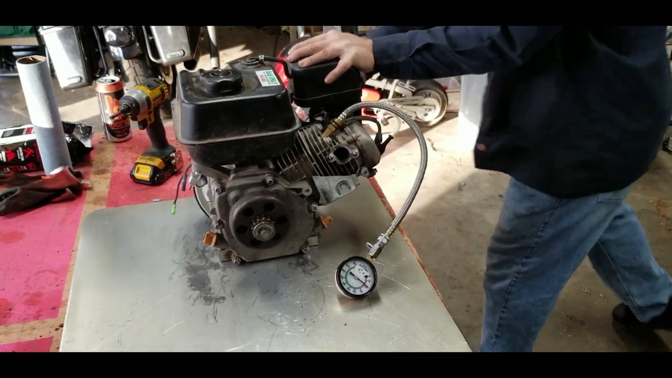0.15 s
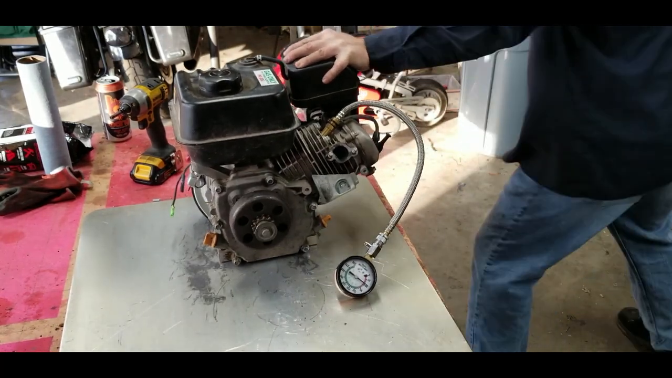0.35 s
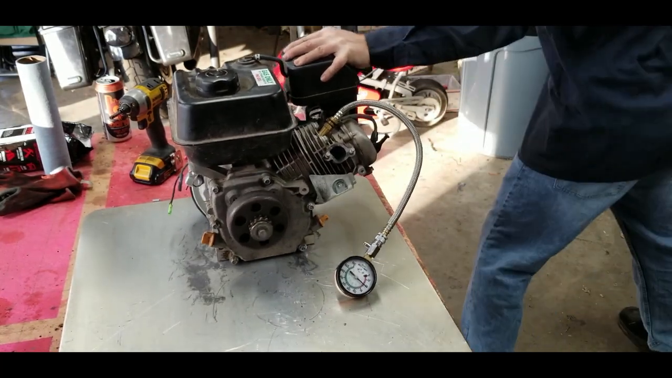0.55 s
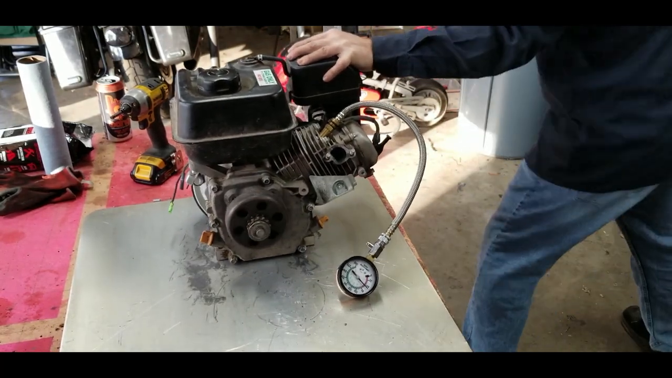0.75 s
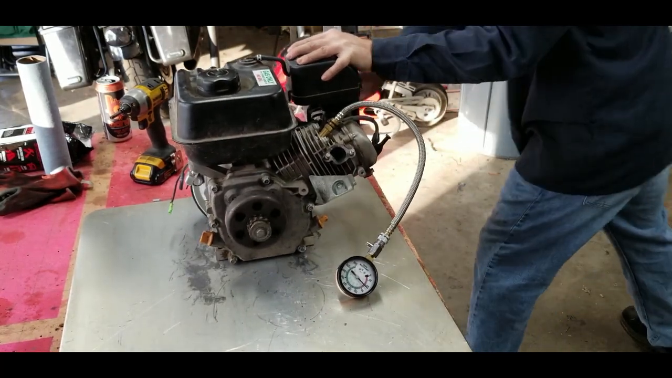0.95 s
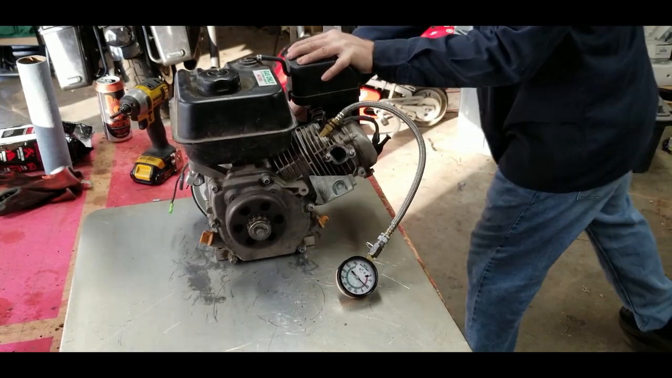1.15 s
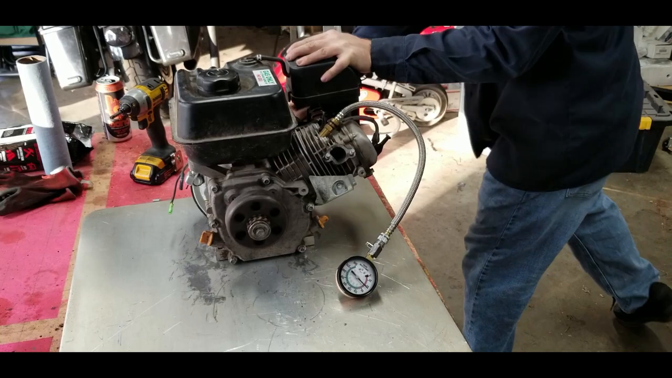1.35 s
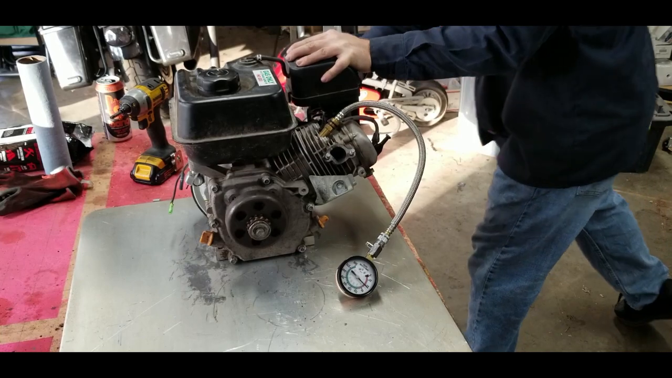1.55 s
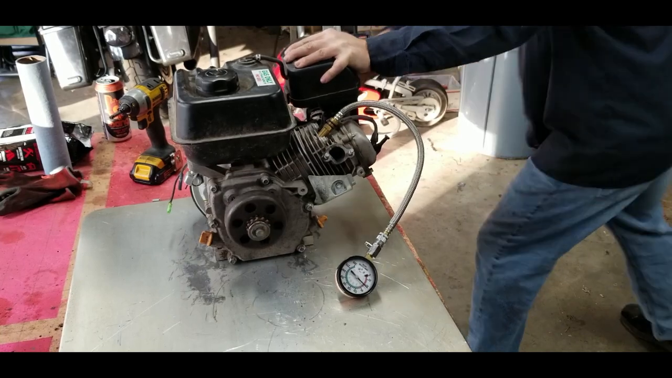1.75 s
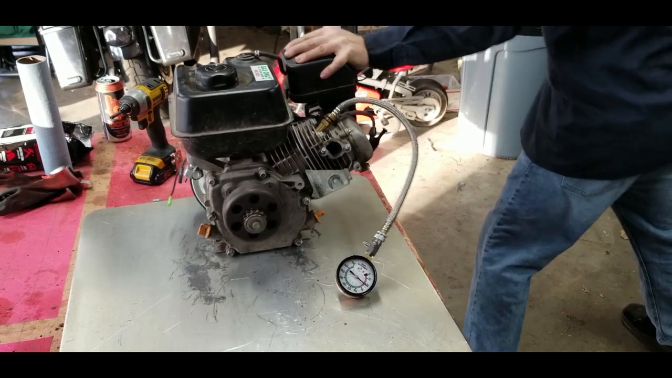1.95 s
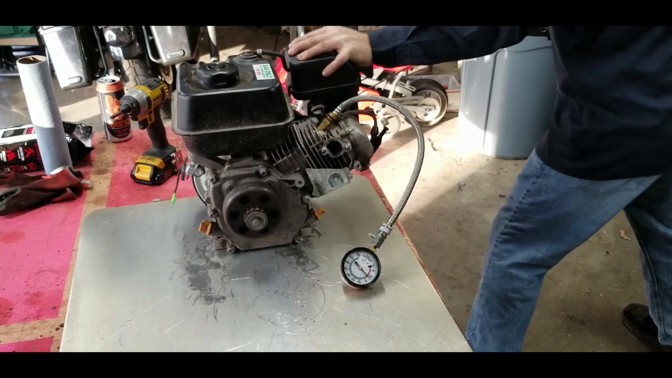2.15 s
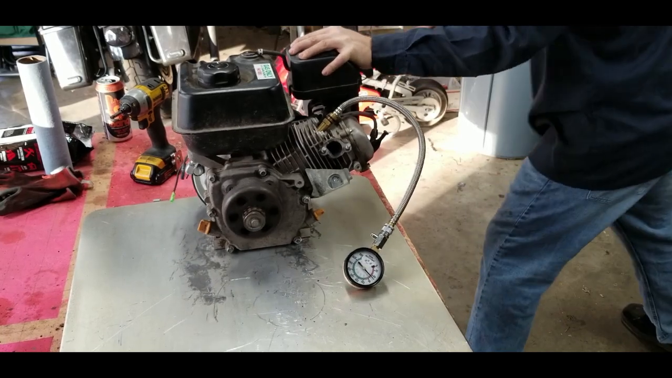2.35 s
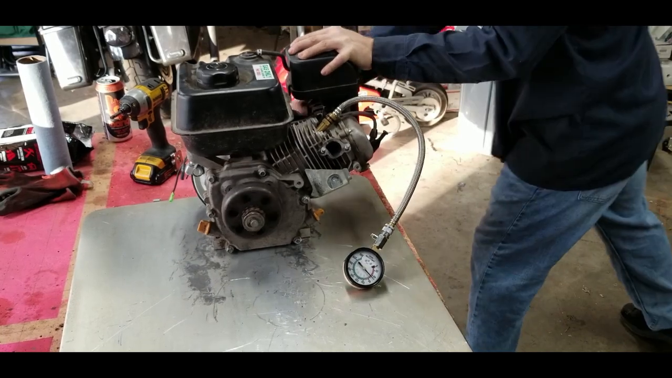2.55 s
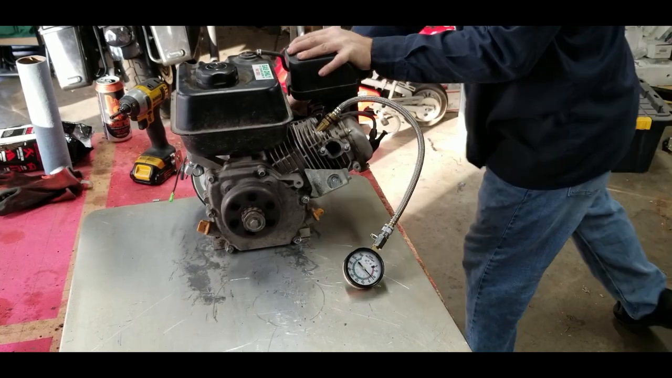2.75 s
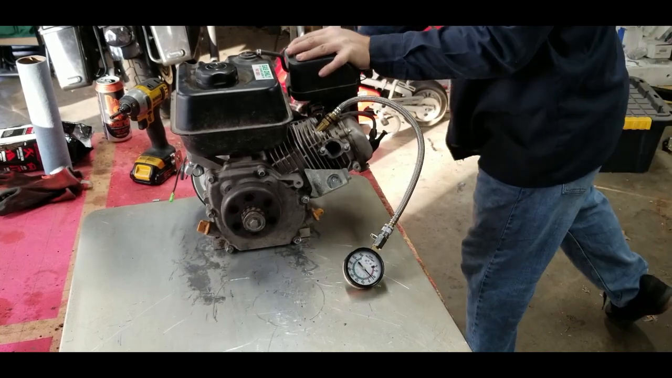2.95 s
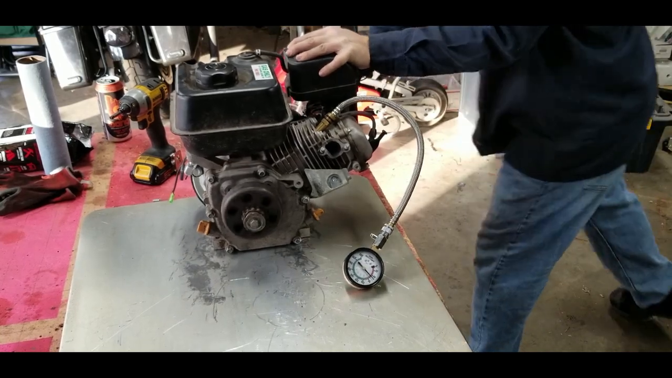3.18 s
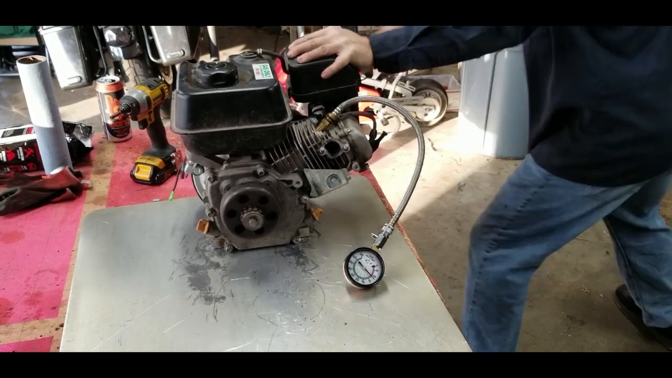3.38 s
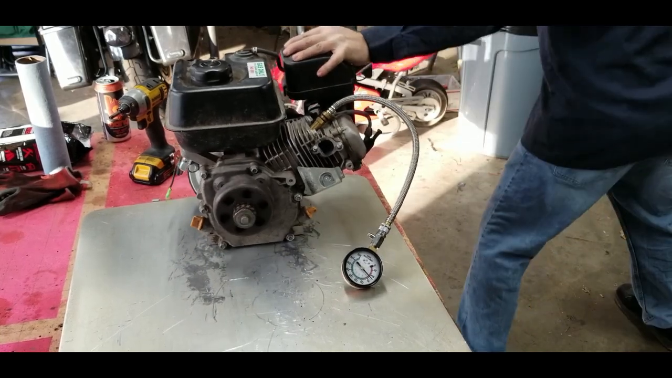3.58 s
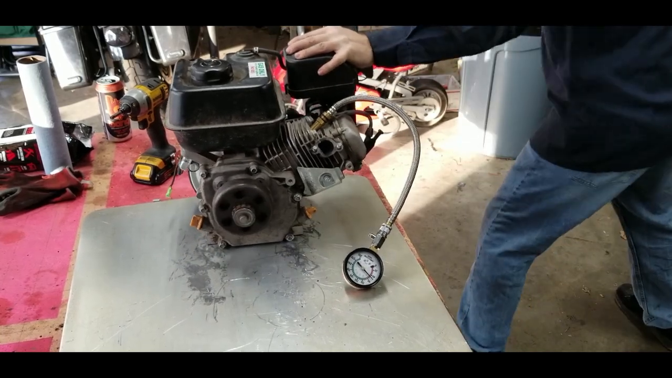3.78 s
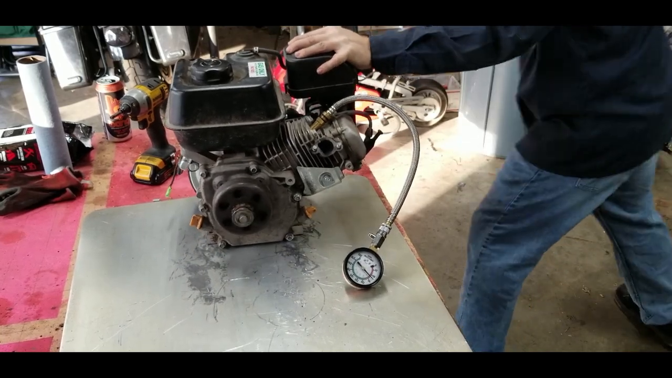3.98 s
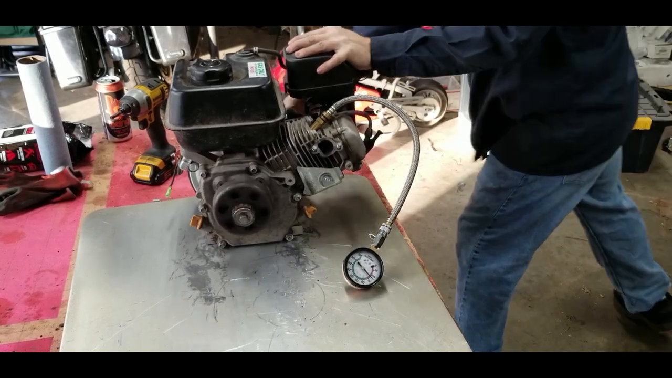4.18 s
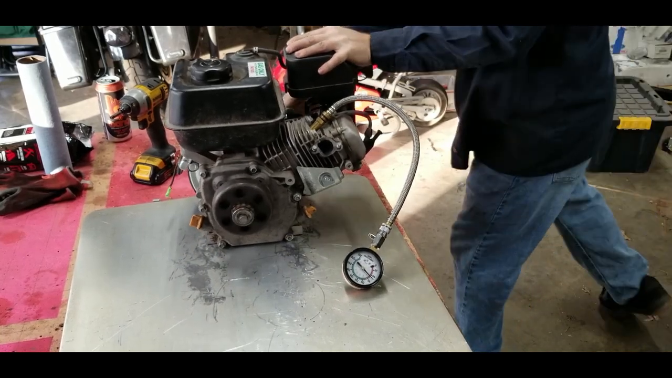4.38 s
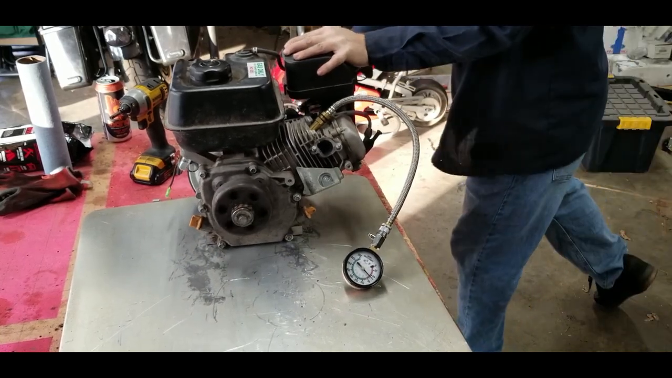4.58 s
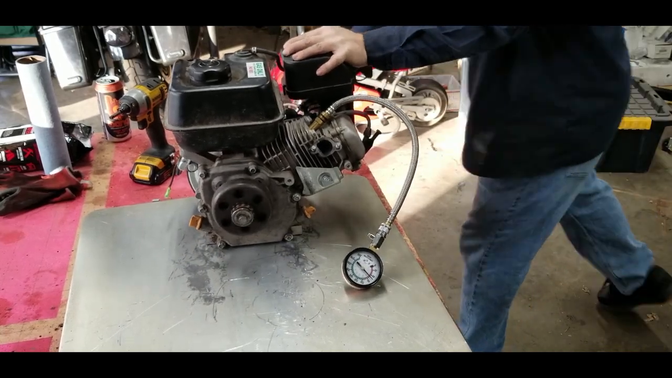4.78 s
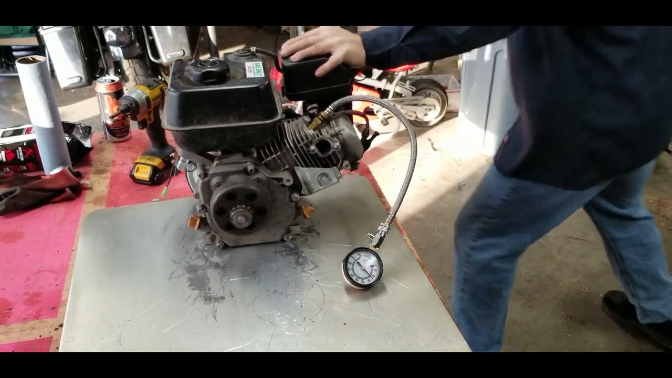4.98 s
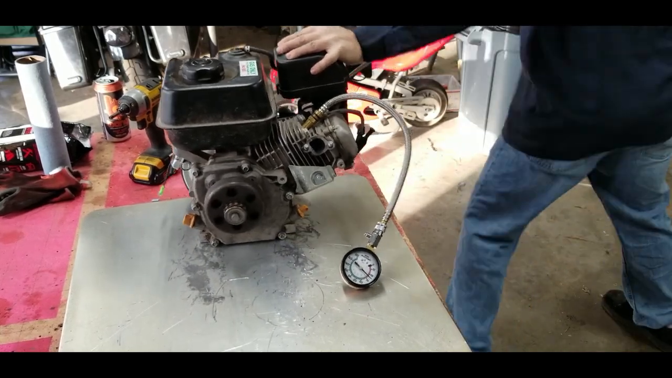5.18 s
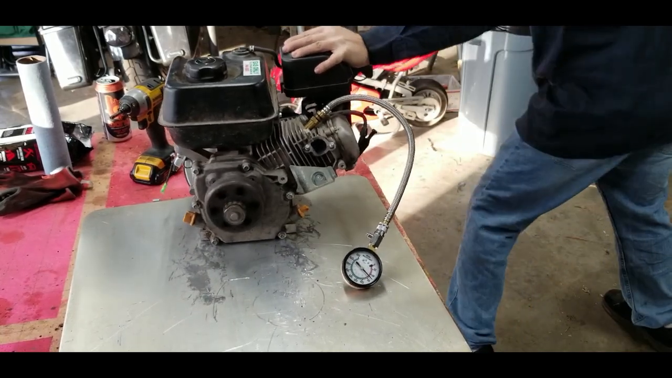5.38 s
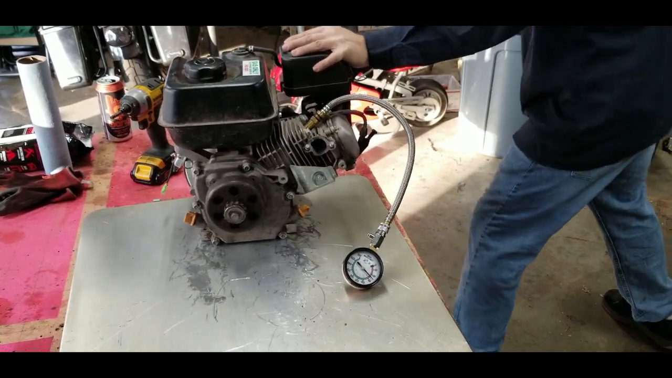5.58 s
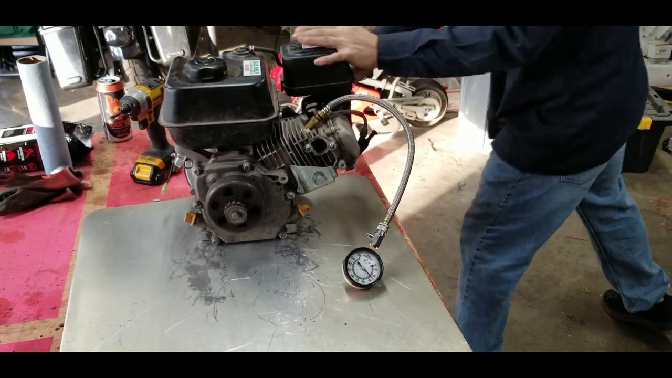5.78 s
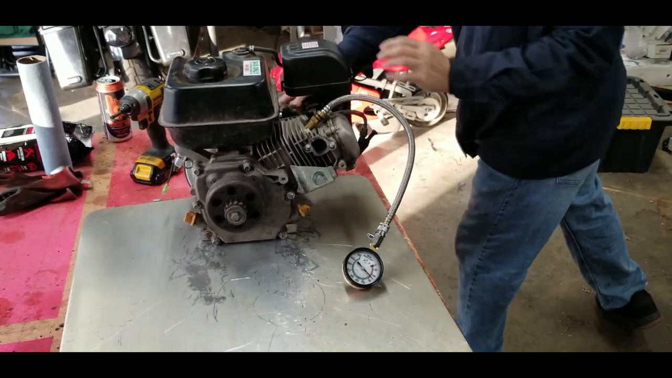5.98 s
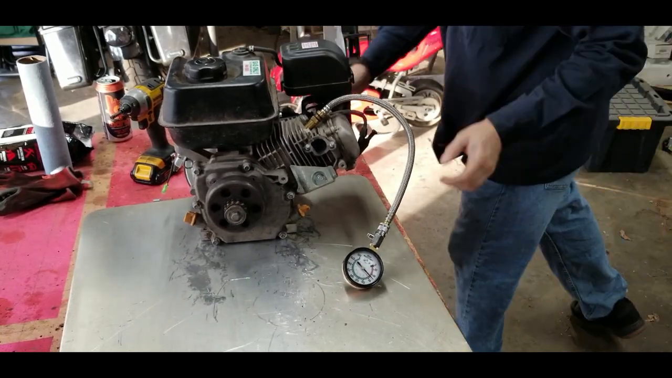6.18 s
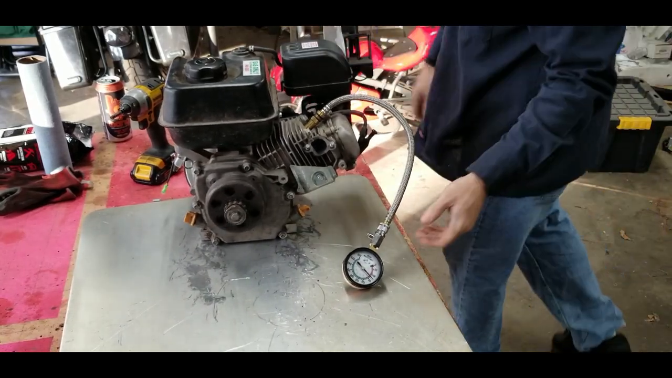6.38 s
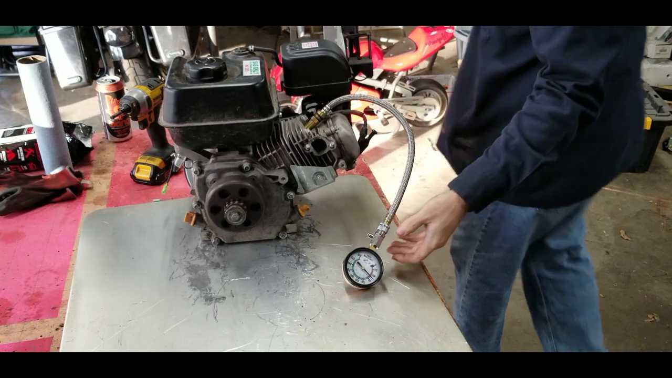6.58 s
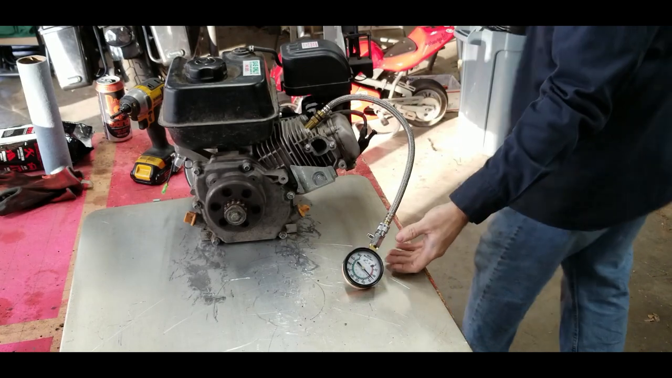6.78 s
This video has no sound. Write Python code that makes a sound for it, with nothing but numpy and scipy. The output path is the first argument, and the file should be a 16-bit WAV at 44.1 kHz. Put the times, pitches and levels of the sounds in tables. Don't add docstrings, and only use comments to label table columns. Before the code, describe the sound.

Close stereo pickup of a small engine on a bench. The rope zips upward in pitch, valves clatter and hiss, the exhaust chuffs in short hollow thumps, pawls tick and a metal cup sings on. A springy rasp reels the cord in and the handle taps the cover. This happens four times with brief quiet gaps; a last hard plastic clunk, a faint distant hum and a sleeve rustle follow, with the room's short echo throughout.

```python
import sys
import numpy as np
from scipy import signal
from scipy.fft import rfft, irfft, next_fast_len
from scipy.io import wavfile
from scipy.ndimage import uniform_filter1d, map_coordinates

SR = 44100
rng = np.random.default_rng(int(sys.argv[2]) if len(sys.argv) > 2 else 0)


def undo_db(level):
    steps = np.asarray(level, float) / 20
    return 10 ** steps


def wrap_up_sound(samples):
    columns = np.atleast_2d(samples).T
    tamed = np.clip(columns, -1, 1)
    steps = np.round(tamed * 32767).astype(np.int16)
    wavfile.write(sys.argv[1], SR, steps)


N = 301423


def unit(x):
    return x / np.sqrt(np.mean(x ** 2) + 1e-20)


def along(points, hz):
    f, v = np.transpose(points)
    return np.interp(np.log(hz + 1), np.log(f + 1), v)


def curves(rows):
    s, *cols = np.transpose(rows)
    return [np.interp(np.arange(N) / SR, s, c) for c in cols]


def wobble(rate):
    return map_coordinates(rng.standard_normal(int(N * rate / SR) + 4), [np.arange(N) * rate / SR])


def filtered(x, response):
    m = next_fast_len(N + SR // 2)
    return irfft(rfft(x, m) * response(np.fft.rfftfreq(m, 1 / SR)), m)[..., :N]


def modes(table):
    return lambda f: sum((-1) ** k * undo_db(db) * 1j * f * width / (hz * hz - f * f + 1j * f * width)
                         for k, (hz, width, db) in enumerate(table))


def band(lo_hz, hi_hz):
    return lambda f: (1j * f / (lo_hz + 1j * f)) ** 2 / (1 + 1.4j * f / hi_hz - (f / hi_hz) ** 2)


def bursts(times, dbs, t60s, rise):
    power, t = np.zeros(N + SR), np.arange(SR // 2) / SR
    for s, db, t60 in zip(times, dbs, np.broadcast_to(t60s, len(times))):
        blow = undo_db(db - 60 * t / max(t60, .01)) * (1 - np.exp(-t / rise))
        power[round(s * SR):][:len(t)] += blow ** 2 * (1 - 2 * t)
    return np.sqrt(power[:N])


def gritty(rate, depth_db):
    return unit(undo_db(depth_db * wobble(rate)) * rng.standard_normal(N))


def shaped(x, response):
    gain = np.sqrt(np.mean(np.abs(response(np.linspace(1, SR / 2, 8192))) ** 2))
    return filtered(x, response) / gain


def patchy(x, depth_db):
    z = signal.stft(x, nperseg=256)[2]
    over_hz = uniform_filter1d(rng.standard_normal(z.shape), 4, 0)
    field = undo_db(depth_db * unit(uniform_filter1d(over_hz, 12, 1)))
    return signal.istft(z * field / np.sqrt(np.mean(field ** 2)), nperseg=256)[1][:N]


# hz, level_db (per Hz)
STILL_AIR = [(20, -17.5), (50, -3.5), (90, -3.5), (150, -13.5), (260, -3.5), (400, -10), (600, -12),
             (820, -19), (950, -46.5), (3000, -40.5), (9000, -39.5), (16000, -48.5)]
# time_s, level_db
FAR_HUM = [
    (0, -71.5),
    (6.06, -79.5),
    (6.12, -55.5),
    (6.5, -65),
    (6.76, -57.5),
    (6.79, -85),
]


def workshop():
    air = shaped(rng.standard_normal((2, N)), lambda f: undo_db(along(STILL_AIR, f)))
    hum_hz = 219
    hum = undo_db(curves(FAR_HUM)[0] + 1.5 * wobble(6.8)) * np.sin(2 * np.pi * hum_hz * np.arange(N) / SR)
    return undo_db(-65.0 + 1.5 * wobble(2.9)) * air + hum


# start_s, peak_db, length_db (re 490 ms)
REWINDS = [
    (0.0, -37, -4.5),
    (1.261, -57, -2),
    (1.3105, -33, 1),
    (2.54, -44.5, -1),
    (2.882, -37.5, 2),
    (4.479, -44, 5),
    (5.8945, -52.5, -8.5),
]
# hz, level_db (per Hz)
SPRING_NOISE = [(1500, -16), (2700, 0.5), (4500, -25.5), (5500, -4), (7200, -16.5), (7900, 2.5), (8600, -6),
                (9400, 2), (11000, -7.5), (16000, -17.5)]


def rewind_spring():
    s, db, length_db = np.transpose(REWINDS)
    reel = bursts(s, db - 13.0, 0.49 * undo_db(length_db), rise=0.003) * gritty(290, depth_db=4.5)
    snap_db, snap_t60_s = 1.5, 0.022
    reel += bursts(s, db + snap_db, snap_t60_s, rise=0.0011) * rng.standard_normal(N)
    return shaped(reel, lambda f: undo_db(along(SPRING_NOISE, f)))


# time_s, effort_db
EFFORT = [
    [(0.0, -41.5), (0.13, -69), (0.29, -48.5), (0.42, -33), (0.56, -28.5), (0.72, -37), (0.9, -44.5),
     (1.14, -64), (1.46, -55.5)],
    [(1.58, -71.5), (1.77, -60), (1.9, -30.5), (2.03, -29), (2.2, -40), (2.38, -46.5), (2.57, -57),
     (2.7, -69), (2.91, -57)],
    [(3.1, -87.5), (3.34, -63.5), (3.42, -35), (3.58, -34.5), (3.75, -32.5), (3.9, -46), (4.2, -54.5),
     (4.36, -63.5), (4.7, -86)],
    [(4.93, -68.5), (5.08, -31), (5.22, -32), (5.38, -36), (5.55, -46), (5.84, -60.5), (6.07, -62.5),
     (6.33, -77), (6.83, -90.5)],
]


def follows(at_rest_db, grows):
    return undo_db(at_rest_db + grows * (curves(sum(EFFORT, []))[0] + 39.5))


# hz, width_hz, level_db
CUP_MODES = [(3020, 20, -8.5), (3100, 22, -2)]


def rubbing_pawls():
    return shaped(follows(-71.5, 1.3) * gritty(60, depth_db=2.5), modes(CUP_MODES))


# start_s, peak_db, dull_db, hiss_db
SLACK_CONTACTS = [(0.223, -40, 3, -13.5), (0.5, -44, -7, -7.5), (1.02, -39.5, 4, -8),
                  (1.261, -46, -23, -14), (1.309, -52, 15, -3), (1.422, -42.5, -6, 8),
                  (1.758, -31, -13.5, -19.5), (2.36, -40.5, 14.5, -17), (2.883, -48, 11.5, -7),
                  (2.955, -45.5, -3, 8.5), (3.523, -25, -1, -9.5), (4.073, -46, -15, 8),
                  (4.479, -39, -5, -12), (4.568, -42, -12, 5), (5.017, -32, 10, -29), (5.167, -22, 11, -5),
                  (5.537, -29.5, -13, -7.5), (5.678, -30, -4, -9.5), (5.893, -34, -10, -5.5)]
# start_s, peak_db, dull_db, hiss_db, ringdown_db (re the rule)
CLACKS = [(0.377, -14, -17.5, -10, -2.5), (0.381, -17.5, -15.5, -7.5, 4), (0.4594, -22.5, -24, -6, -5.5),
          (0.5307, -4, -3, -10.5, -2), (0.553, -7, -14.5, -4, -2.5), (0.573, -12.5, -15.5, -13, -3.5),
          (0.647, -19, -20.5, -10.5, -3.5), (0.7064, -13.5, -18.5, -12, -3.5),
          (0.797, -32, 0.5, -10.5, -2.5), (1.703, -36, -10, -24.5, 4), (1.8098, -13, -14.5, -5, -2),
          (1.8204, -15.5, -15, -11, -3.5), (1.8945, -11, -18, -6.5, 1), (1.8826, -21, -16.5, -14.5, -3.5),
          (1.9226, -6, -25.5, -19.5, -3), (1.944, -11, -24, -14, -3.5), (1.999, -7, -12.5, -8.5, 1.5),
          (2.068, -7, -19.5, -14, -2), (2.2488, -29, -5.5, -6, -1), (2.275, -16.5, -22, -10.5, -4.5),
          (2.3332, -19, 0.5, -16, -4), (2.543, -30.5, -15, -19, 2.5), (3.381, -19.5, -14.5, -12, 1.5),
          (3.3916, -12.5, -19, -16, -0.5), (3.5312, -21.5, -14, -8.5, -3.5), (3.569, -9, -9, -12, -1),
          (3.585, -7, -23.5, -6.5, 1.5), (3.612, -19, -16, -9.5, -5), (3.68, -20.5, -19, -3, 2.5),
          (3.8839, -27.5, -7, -14, 5), (3.913, -16, -15, -16.5, -1), (3.9942, -25.5, 1, -34.5, 2),
          (4.134, -32, -28, -3.5, 0), (4.9074, -36.5, 0.5, -12.5, 11), (5.039, -9.5, -16, -10.5, -9),
          (5.06, -14, -11, -23, -1), (5.18, -4.5, -17, -12.5, 0), (5.189, -11, -18, -12, -6),
          (5.205, -13.5, -18.5, -12.5, -4), (5.221, -7, -28.5, -15, -8), (5.2913, -19, -12, -15.5, 1.5),
          (5.334, -12, -22, -7, -2), (5.5666, -19, -22, -16, 0), (5.745, -28, -12, -22, -7)]


def contacts():
    knock_shakes = (-7, -15, -32)  # peak, dull and hiss parts (dB)
    drop_shakes = (-6, -12, -20)
    tick_peak_db, tick_dull_db = -1.9, -2.5
    plain = list(SLACK_CONTACTS)
    for hits, (peak_db, dull_db, hiss_db) in ((KNOCKS, knock_shakes), (LAST_DROP, drop_shakes)):
        plain += [(hit[0], hit[1] + peak_db, dull_db, hiss_db) for hit in hits]
    ticks = [(s, db + tick_peak_db, tick_dull_db, hiss_db, 0) for s, db, _, hiss_db in TICKS]
    rows = CLACKS + [tuple(hit) + (0,) for hit in plain] + ticks
    s, db, dull_db, hiss_db, long_db = np.transpose(rows)
    t60 = 0.11 * undo_db(0.089 * (db + 23.5) + long_db)
    light = slice(-len(TICKS), None)
    t60[light] = 0.055 * undo_db(0.3 * (db[light] + 22.5))
    return s, db, dull_db, hiss_db, t60


# hz, level_db (per Hz)
METAL_NOISE = [(180, -31.5), (300, 8.5), (572, 5), (621, 4.5), (674, 1), (1470, -4), (2450, -10.5),
               (2990, -4.5), (3410, -9.5), (4440, -12), (7410, -22), (9500, -18), (15600, -19)]
# hz, width_hz, level_db
CASING_MODES = [(1450, 120, -0.5), (3160, 47, -2.5), (4280, 64, -5.5), (7700, 110, -12.5), (9500, 230, -18),
                (12700, 410, -10), (14000, 90, -22)]
# hz, level_db (per Hz)
ROCKING_NOISE = [(20, -32), (45, -10), (100, -2.5), (170, -7.5), (230, -2.5), (330, -13.5), (500, -28.5),
                 (900, -90)]


def engine():
    s, db, dull_db, hiss_db, t60 = contacts()

    def metal(f):
        return undo_db(along(METAL_NOISE, f)) + 0.28 * modes(CASING_MODES)(f)

    jerks = undo_db(1.5 * wobble(45) - 1.5)
    core = bursts(s - .002, db - 15.5, 0.03, rise=0.0017)
    dull = jerks * follows(-40, 0.9) + bursts(s, db + dull_db - 6.0, 1.4 * t60, rise=0.014)
    sharp = jerks * follows(-44.5, 0.92) + core + bursts(s, db - 14.5, t60, rise=0.0022)
    hiss = jerks * follows(-69.5, 0.25) + bursts(s, db + hiss_db - 7.0, 1.4 * t60, rise=0.0001)
    sound = shaped(dull * gritty(150, depth_db=1.5), lambda f: metal(f) * band(330, 1800)(f))
    sound += shaped(sharp * gritty(350, depth_db=3.0), lambda f: metal(f) * band(1600, 6500)(f))
    sound += shaped(hiss * gritty(400, depth_db=4.5), lambda f: metal(f) * band(6500, 19000)(f))
    sound = patchy(sound, depth_db=2.6)

    rocking = shaped(gritty(25, depth_db=2.0), lambda f: undo_db(along(ROCKING_NOISE, f)))
    puff_s, puff_db = np.transpose(PUFFS)[:2]
    jolts = bursts(puff_s, puff_db - 13.5, 0.27, rise=0.027)
    return sound + (follows(-40, 0.81) + jolts) * rocking


# start_s, peak_db, bright_db
KNOCKS = [
    (0.229, -48, -16),
    (1.133, -25.5, -36),
    (1.421, -29, 5.5),
    (1.706, -35.5, -5),
    (2.612, -18.5, -4.5),
    (2.953, -32, 4),
    (3.303, -39.5, -17.5),
    (4.212, -21, -33),
    (4.568, -34.5, 2),
    (4.91, -43, -15.5),
]
# start_s, peak_db, bright_db
LAST_DROP = [
    (6.0, -9.5, -1),
]
# hz, width_hz, level_db
COVER_MODES = [(505, 45, 1), (614, 39, 3.5), (765, 30, 4), (1000, 15, 0.5), (1243, 53, -6),
               (1340, 50, -12.5)]
# hz, width_hz, level_db
SEAT_MODES = [(536, 56, 4.5), (630, 44, 10), (716, 27, 6), (779, 37, 7.5), (995, 32, -1.5), (1255, 49, 0),
              (1523, 40, 3), (1980, 43, -4), (2220, 69, -12), (2716, 50, -3.5), (2950, 90, -6.5),
              (3210, 60, -8), (3660, 60, -12), (4370, 91, -16)]
# delay_s, level_db
BOUNCES = [
    (0, 11.5),
    (.0025, 12.5),
    (.0065, 14),
    (.015, 11),
    (.021, 7.5),
]


def handle():
    sound = np.zeros(N)
    cover = (KNOCKS, COVER_MODES, 1900, 1150)
    seat = (LAST_DROP, SEAT_MODES, 3600, 1300)
    for hits, body, blow_hz, hum_hz in (cover, seat):
        s, db, bright_db = np.transpose(hits)
        blow = bursts(s - .002, db - 8.0, 0.11, rise=0.0014) * gritty(300, depth_db=4.0)
        late, bounce_db = np.transpose(BOUNCES)
        when = s[:, None] + late * rng.uniform(.85, 1.15, (len(s), len(late)))
        np.add.at(blow, np.round(when * SR).astype(int), undo_db(db[:, None] + bounce_db))
        sound += shaped(blow, lambda f: (modes(body)(f) + 0.24) * band(470, blow_hz)(f) ** 2)
        hum_db = -42 + 0.46 * (db + 23.5)
        after = bursts(s, hum_db, 0.57, rise=0.011) * gritty(60, depth_db=1.5)
        sound += shaped(after, lambda f: (modes(body)(f) + 0.1) * band(520, hum_hz)(f) ** 2)
        crack = bursts(s, db + bright_db - 20.5, 0.2, rise=0.0012) * gritty(300, depth_db=3.0)
        sound += shaped(crack, band(1400, 2800))
    return sound


# start_s, start_hz, end_s, end_hz
WHIRRS = [
    (.23, 450, .41, 2500),
    (1.72, 500, 1.88, 2400),
    (3.30, 500, 3.44, 2400),
    (4.91, 480, 5.055, 2450),
]
WHIRR_LEVELS = [-56, -54.5, -53.5, -51]
WHIRR_ORDERS = [.5, 1, 2, 3]
ORDER_LEVELS = [-5.5, 0, -11, -13.5]


def rope_whirr():
    t, sound = np.arange(N) / SR, np.zeros(N)
    for (start, start_hz, end, end_hz), db in zip(WHIRRS, WHIRR_LEVELS):
        u = np.clip((t - start) / (end - start), 0, 1)
        pitch_hz = start_hz + (end_hz - start_hz) * u ** .8
        turns = np.cumsum(pitch_hz * (1 + .022 * wobble(400))) / SR
        tone = np.zeros(N)
        for k, order_db in zip(WHIRR_ORDERS, ORDER_LEVELS):
            tone += undo_db(order_db - 1.5) * (1 + 1.1 * wobble(150)) * np.sin(2 * np.pi * k * turns)
        sound += undo_db(db + 14 * u) * np.sin(np.pi * u) ** 0.18 * tone
    return sound


# start_s, peak_db, push_db (low push), hiss_db (valve)
PUFFS = [(0.37, -29.5, 1.5, -5.5), (0.436, -13.5, -6, -9.5), (0.589, -14.5, -9.5, -6.5),
         (0.701, -29, -5, -7.5), (0.801, -20, -13, -14.5), (1.752, -44.5, 4, -7.5),
         (1.822, -14, -8.5, -8.5), (1.973, -12, -10.5, -10.5), (2.061, -30, 5, -20),
         (2.134, -15, -10.5, -12.5), (2.395, -30.5, -5.5, -6.5), (3.455, -14, -17.5, -13),
         (3.596, -14, -17, -1), (3.763, -15.5, -10, -11), (3.894, -32, -0.5, -8),
         (5.011, -25, -18.5, -22.5), (5.031, -26, -14, -15.5), (5.092, -13, -13, -8.5),
         (5.228, -12.5, -5, -6.5), (5.403, -15.5, -10, -14), (5.674, -52.5, 8, -1)]
# ring_hz, ring_t60_s, push_hz, push_t60_s
MUFFLER = (260, 0.15, 165, 0.06)
# pitch_hz, level_db, t60_s
CHAMBER = (192, -9.5, 0.1)


def chuffs():
    sound, t = np.zeros(N + SR), np.arange(SR // 3) / SR
    ring_hz, ring_t60, push_hz, push_t60 = MUFFLER
    chamber_hz, chamber_db, chamber_t60 = CHAMBER
    beat = 1 + 0.089 * np.cos(2 * np.pi * 50 * t)
    sag, sag_s = -.3, .006
    ring_phase = 2 * np.pi * ring_hz * (t + sag * sag_s * (1 - np.exp(-t / sag_s)))
    for s, db, push_db, _ in PUFFS:
        ring = beat * undo_db(db - 60 * t / ring_t60) * np.sin(ring_phase)
        ring += undo_db(db + chamber_db - 60 * t / chamber_t60) * np.sin(2 * np.pi * chamber_hz * t)
        push = undo_db(db + push_db + 6.5 - 60 * t / push_t60) * np.sin(2 * np.pi * push_hz * t)
        sound[round((s + .005) * SR):][:len(t)] -= (ring + push) * (1 - np.exp(-t / 0.0009))
    s, db, _, hiss_db = np.transpose(PUFFS)
    spit = bursts(s - .002, db + hiss_db - 2.5, 0.066, rise=0.0018)
    leak = bursts(s - .002, db + hiss_db - 21.5, 0.1, rise=0.0018)
    jet = (spit + leak) * rng.standard_normal(N)
    return sound[:N], shaped(jet, lambda f: band(9000, 14000)(f) ** 2)


# start_s, peak_db, upper_db (upper resonance), hiss_db
TICKS = [(0.4076, -14.5, 4, -15), (0.759, -22.5, 5, -20.5), (0.925, -43, 9, -28), (1.2614, -51, -1, -8),
         (1.358, -44, -6, -14), (1.41, -49.5, 2, -14), (1.7737, -18, -2, -5.5), (1.954, -15.5, 12, -13.5),
         (2.413, -33, 5.5, -14), (2.8458, -46.5, -1, -0.5), (3.08, -49.5, 5, -20),
         (3.3298, -25, -5.5, -9.5), (3.432, -14, -2, -20.5), (3.5013, -20.5, 4, -22.5),
         (3.5467, -16, 6, 2.5), (3.698, -15.5, 4, -9.5), (4.047, -21, -7, -12), (4.44, -43, 2, -14),
         (4.7306, -52.5, 1, -14), (4.7447, -53.5, 2, -9), (4.7648, -55, 5.5, -10), (4.828, -54, 0, -12),
         (5.038, -20, 7, -7.5), (5.332, -18, 9, -6), (5.4812, -42.5, -4, -15), (5.8288, -23, -1, -25.5)]
# hz, width_hz, level_db
PAWL_MODES = [(2900, 370, -1), (4245, 330, -3)]


def pawls():
    s, db, upper_db, _ = np.transpose(TICKS)
    taps = np.zeros((2, N))
    for late, bounce_db in ((0, 6), (.0016, 2), (.0037, -14.5)):
        size_db = db + bounce_db + 28.5 + rng.normal(0, 1.6, len(s))
        taps[:, np.round((s + late) * SR).astype(int)] += undo_db([size_db, size_db + upper_db])

    def answer(f):
        return np.array([modes([mode])(f) ** 2 + 0.0053 * band(2000, 14000)(f) for mode in PAWL_MODES])

    return filtered(taps, answer).sum(axis=0)


# start_s, level_db, coasting_s
CUP_STRIKES = [
    (0.575, -28, 0.54),
    (0.749, -37, 0.29),
    (1.959, -43.5, 0.57),
    (2.621, -54.5, 0.049),
    (3.589, -31, 0.48),
    (3.755, -35, 0.31),
    (4.488, -50, .05),
    (5.191, -28, 0.52),
    (5.469, -36, 0.23),
    (5.829, -53, 0.053),
]
UPPER_LEVELS = [-3, -16.5, -9, -17, 4.5, -6, -20.5, -14, -20, -18]


def cup():
    sound, t = np.zeros(N + SR), np.arange(SR) / SR
    cup_hz, split_hz, upper_hz = 3048, 48, 5390
    cup_t60_s, upper_t60_s = 1.13, 1.1
    for (s, db, coast), upper_db in zip(CUP_STRIKES, UPPER_LEVELS):
        split = split_hz * np.cumsum(np.clip(1 - t / coast, 0, 1)) / SR
        ring = np.sin(2 * np.pi * (cup_hz * t + split))
        ring += undo_db(-3.5) * np.sin(2 * np.pi * (cup_hz * t - split))
        upper = np.sin(2 * np.pi * upper_hz * t) * np.cos(2 * np.pi * split)
        ring += undo_db(upper_db - 60 * t / upper_t60_s) * upper
        sound[round(s * SR):][:SR] += undo_db(db - 60 * t / cup_t60_s) * (1 - np.exp(-t / 0.008)) * (1 - t) * ring
    return sound[:N] * undo_db(2.5 * wobble(30))


# centre_s, level_db, half_length_s, low_hz, high_hz
RUSTLES = [
    (6.47, -66.5, 0.072, 2700, 9600),
    (6.77, -71.5, .07, 4000, 6500),
    (6.29, -82, 0.018, 3500, 5000),
]


def sleeve():
    t, sound = np.arange(N) / SR, np.zeros((2, N))
    cloth = np.array([gritty(200, depth_db=1.5), gritty(200, depth_db=1.5)])
    for s, db, half, lo_hz, hi_hz in RUSTLES:
        brush = undo_db(db) * np.exp(-((t - s) / half) ** 4) * cloth
        sound += shaped(brush, lambda f: band(lo_hz, hi_hz)(f) ** 2)
    return sound


def tails(points, scale, gap):
    hz, t, z = signal.stft(rng.standard_normal((2, SR // 2)), SR, nperseg=128)
    decay = undo_db(-60 * t / (scale * along(points, hz))[:, None])
    tail = signal.istft(z * decay, SR, nperseg=128)[1]
    return np.pad(tail / np.linalg.norm(tail[0]), ((0, 0), (gap, 0)))


# hz, t60_s
WALLS = [(100, 0.97), (500, 0.63), (1400, 0.44), (4000, 0.48), (12000, 0.33)]
# hz, level_db
APART = [(50, -8), (300, -11), (700, -3), (2000, 1), (6000, 5), (15000, 5)]


def room(x):
    out, step, fade = np.zeros((2, N + 2 * SR)), SR // 5, SR // 50
    ramp = np.sin(np.pi / 2 * np.arange(fade) / fade)
    window = np.concatenate([ramp, np.ones(step - fade), ramp[::-1]])
    for start in range(0, N, step):
        bench = tails(WALLS, 0.047, gap=20)[:, :SR // 2]
        walls = tails(WALLS, 1.0, gap=400)[:, :SR // 2]
        piece = x[start:start + step + fade]
        part = signal.fftconvolve((piece * window[:len(piece)])[None], bench + undo_db(-2) * walls, axes=1)
        out[:, start:start + part.shape[1]] += part
    return filtered(out[:, :N], lambda f: undo_db(along(APART, f)))


def scene():
    starter = rewind_spring() + rubbing_pawls() + rope_whirr()
    (puff, jet), ticks, knocks = chuffs(), pawls(), handle()
    near = starter + engine() + jet
    direct = near + knocks + puff + ticks + cup()
    reflected = room(near + undo_db(-2) * knocks + undo_db(-3.5) * puff + undo_db(-15.5) * ticks)
    return workshop() + undo_db(-0.52) * (direct + reflected) + sleeve()


def top_cut(x):
    return signal.sosfilt(signal.butter(12, 16980, fs=SR, output="sos"), x)


# hz, level_db
LEAN = [(60, -1), (120, -1), (240, -3), (480, -5.5), (950, -5.5), (1890, -5.5), (3770, -9.5), (7520, -4),
        (15000, -5)]


def record(dry):
    side = np.array([[.5], [-.5]])
    lag_fades_hz, top_hz = 7100, 15800

    def port(f):
        return undo_db(side * along(LEAN, f)) * np.exp(4j * np.pi * side * f / SR / (1 + (f / lag_fades_hz) ** 4))

    def edge(f):
        return undo_db(-60 * np.clip((f - top_hz) / 250, 0, 1.5)) * 1j * f / (60 + 1j * f)

    ports = filtered(dry, port)
    soft = ports / np.sqrt(np.sqrt(1 + (ports / .8) ** 4))
    return top_cut(filtered(soft, edge))


dry = scene()
out = record(dry)
wrap_up_sound(out)
```